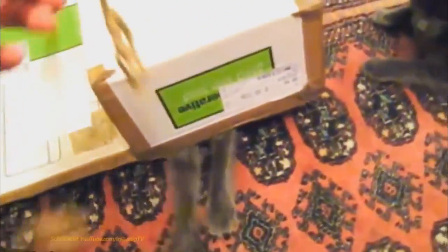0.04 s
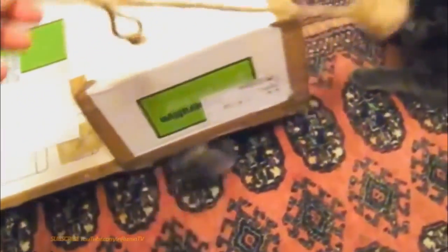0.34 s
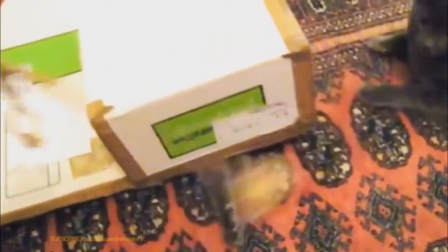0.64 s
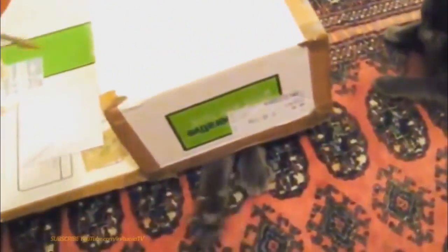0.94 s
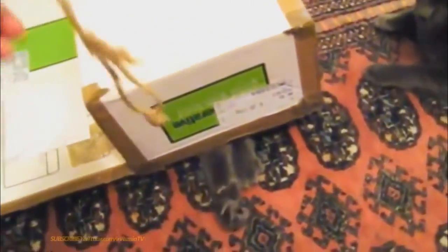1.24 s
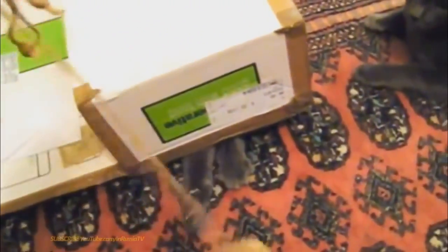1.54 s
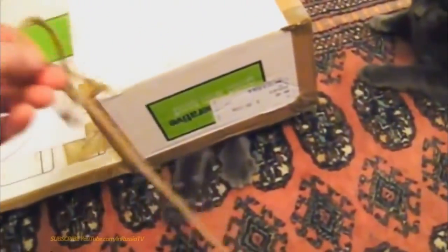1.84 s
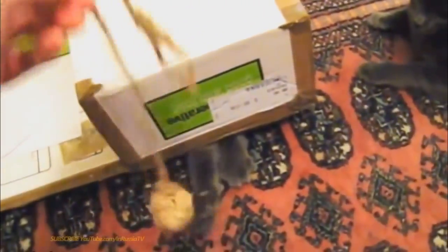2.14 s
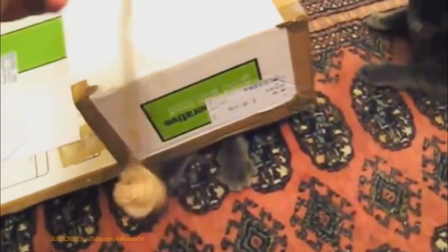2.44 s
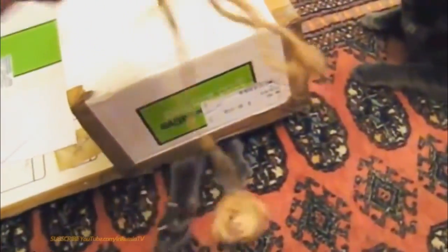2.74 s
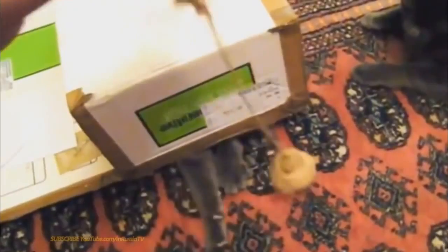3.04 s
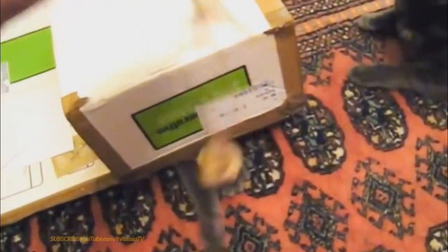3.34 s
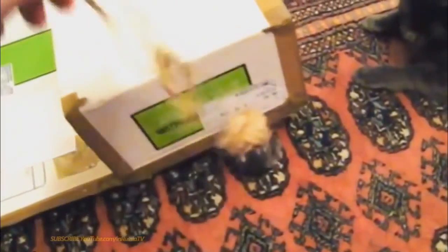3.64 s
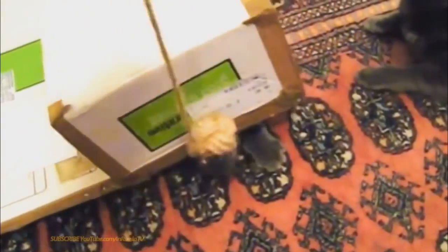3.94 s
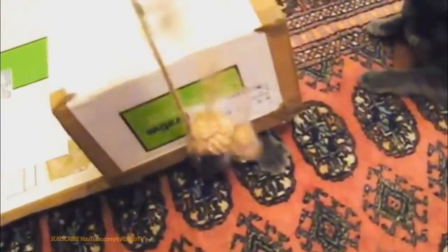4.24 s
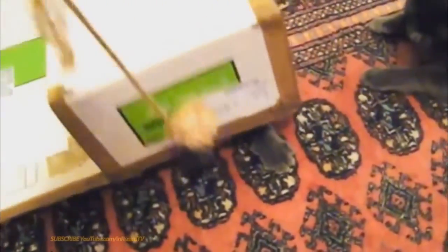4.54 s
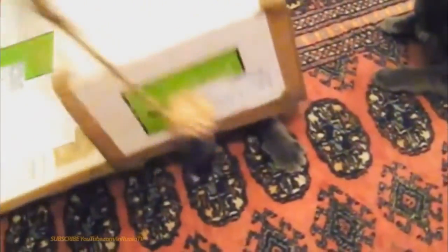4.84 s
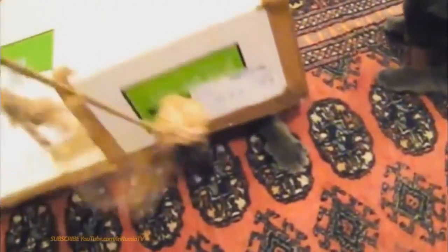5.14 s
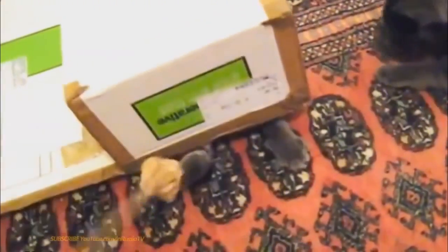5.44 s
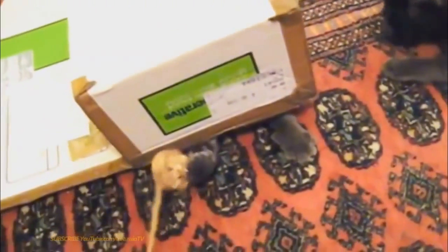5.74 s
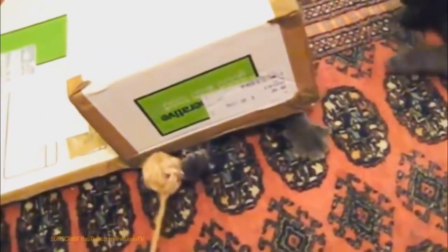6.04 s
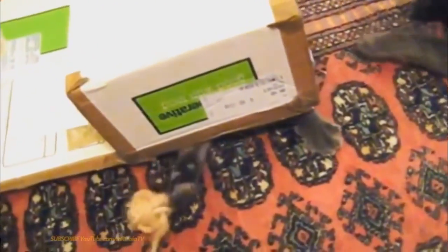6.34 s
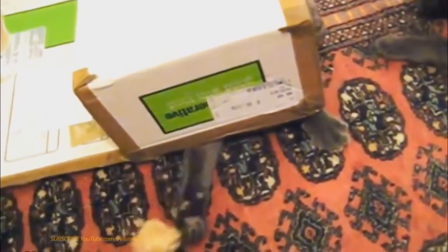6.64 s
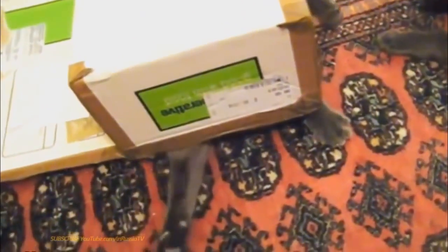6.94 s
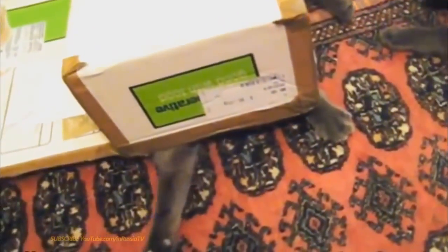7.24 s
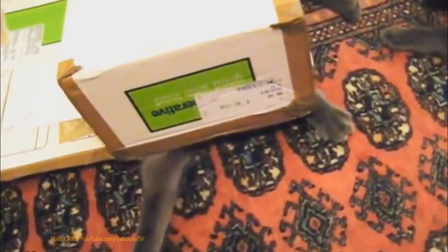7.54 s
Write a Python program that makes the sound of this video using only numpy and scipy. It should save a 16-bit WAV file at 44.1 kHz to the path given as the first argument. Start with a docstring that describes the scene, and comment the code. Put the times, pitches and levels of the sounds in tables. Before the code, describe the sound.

Close up in a furnished room, light taps and scuffs on cardboard lead into hollow bumps as a cat jostles a box on a rug. The loudest thump comes near the middle, followed by a quick flurry of knocks, claw ticks and rustling. It ends with softer scuffs and a few faint squeaks of a leg against the rim. A barely audible little bell jingles now and then over gritty room noise.

```python
"""An upturned cardboard box thumps on a rug as the cat under it swipes at a twine ball.
Landings ring the cavity, lid and walls; a loose flap chatters; claws and ball tap the cardboard.
Fur and paws scuff, a leg squeaks along the rim, a pellet skids faintly in a tiny bell.
One close microphone, furnished room. Coarse quantising turns room tone and low hum gritty;
a faint steady hiss is added after it."""
import sys
import numpy as np
from scipy import signal
from scipy.fft import rfft, irfft, next_fast_len
from scipy.io import wavfile

SR = 44100
rng = np.random.default_rng(int(sys.argv[2]) if len(sys.argv) > 2 else 0)


def persist_wave(psi):
    """Save psi, clipped to +-1, as 16-bit WAV."""
    counts = np.round(np.clip(psi, -1, 1) * 32767).astype(np.int16)
    wavfile.write(sys.argv[1], SR, np.atleast_2d(counts).T)


N = 339380
AGE_S = np.arange(SR // 2) / SR  # time since a blow

# landings: t/s, level/dB, cavity and lid tuning/ratio, hardness (0 cushioned, 1 stiff edge),
# flatness (0 corner, 1 whole rim)
LANDINGS = [(.602, -44.5, .7, 0.29, 0.81), (1.536, -28.5, 0.78, 0.34, 0.47), (1.544, -22, 0.83, 0.13, 0.77),
            (1.572, -32, 0.74, 0.4, 0.58), (2.062, -31, 0.7, 0.16, 0.81), (2.215, -38.5, 0.76, 0.11, 0.98),
            (2.4399, -27, 0.68, 0.43, 1), (2.4476, -29, 1.06, 0.73, 0.45), (3.4496, -17, 0.83, 0.42, 0.11),
            (3.6155, -20, 1.29, 0.79, 0.84), (4.072, -43.5, 1.17, 0.94, 0.11),
            (4.1952, -36.5, 1.3, 0.85, 0), (4.666, -26.5, 0.64, 0.071, 0.31),
            (4.6767, -27, 1.18, 0.14, 0.43), (4.685, -33, 1.46, 0.98, 0.24),
            (4.6947, -27.5, 1.3, 0.69, 0.3), (4.741, -37.5, 0.72, 0.21, 0.72),
            (4.77, -35.5, 1.17, 0.2, 0.83), (4.946, -37.5, 1.02, 0.11, 0.91),
            (5.0398, -25, 1.04, 0.18, 0.79), (5.094, -37.5, 1.1, 0.96, 0.41), (5.101, -28.5, 1.02, 0.12, 1),
            (5.4074, -25, 1.04, 0.32, 0.95), (5.795, -45.5, 1.24, 0.32, 0.84), (5.926, -43, 1.02, 0.77, 1),
            (6.23, -27, 1.06, 0, 0.59), (6.247, -36.5, 0.58, 0.019, 0.2), (7.225, -42.5, 0.88, 0.74, .05)]
# box modes (1 cavity, 2 lid, then walls): untuned f/Hz, relative level/dB, t60/s
BOX_MODES = [(113.9, 1, 0.053), (222, 4.5, 0.04), (331, -3.5, 0.019), (400.3, 0, 0.035), (488.7, -3.5, .05),
             (584, -6.5, .04), (708.7, -10, 0.053), (883.5, -6, 0.034), (1046, -14.5, 0.02),
             (1232, -6, 0.014)]
# hollow notes from mid-wall blows: t/s, f/Hz, level/dB
WALL_RINGS = [(.603, 617, -44), (1.539, 678, -33.5), (2.445, 476, -28), (2.456, 680, -33),
              (2.494, 455, -38.5), (4.695, 397, -30), (4.805, 548, -34), (5.07, 540, -34.5),
              (6.233, 462, -46), (6.258, 206, -37), (6.436, 213.6, -37), (7.04, 755, -49)]
# flap slaps: t/s, level/dB
SLAPS = [(1.534, -41.5), (4.668, -43.5), (4.673, -43), (4.682, -43), (4.695, -45.5), (5.41, -41.5)]
# flap modes: unbent f/Hz, relative level/dB
FLAP_MODES = [(1250, 4.5), (1544, 1), (1918, 3), (2900, -5.5), (3440, -3)]
# taps: t/s, level/dB, sharpness (0 ball on a wall, 1 claw tip)
TAP_HITS = [(.206, -51.5, 0.15), (.388, -44.5, 0.11), (0.6005, -39.5, 0.4), (1.5335, -31, 0.86),
            (1.541, -30.5, 0.86), (2.0595, -43, 0.023), (2.346, -45.5, 0.97), (2.441, -32.5, 0.027),
            (3.7655, -46.5, 0.13), (4.195, -44, 0.66), (4.605, -39, 0.34), (4.6833, -40, 0.55),
            (4.778, -38.5, 0.75), (4.806, -33, 0.25), (4.985, -43.5, 0.87), (5.067, -31.5, 0.58),
            (5.267, -45, 0.74), (5.304, -43.5, 0.15), (5.336, -38, 0.03), (5.3692, -38, 0.44),
            (5.482, -38, 0.11), (5.598, -48, 0.064), (6.149, -50.5, 0.14), (7.0393, -44, 0.025)]
# contact spectra: f/Hz, relative level/dB
CRACK_SHAPE = [(300, -11.5), (850, -3.5), (1450, 11.5), (3200, -4), (4600, -9.5), (8000, -20)]  # fibres crushed on landing
SNAP_SHAPE = [(1500, -6), (3000, 2), (4500, -9.5), (9000, -18.5)]  # flap edge catching
FOLD_SHAPE = [(400, -39), (900, 19.5), (1400, 10.5), (2100, -0.5), (3000, -21.5), (6000, -12)]  # tapped fold
CLAW_SHAPE = [(1200, -25.5), (2300, 8.5), (4500, -1.5), (7000, -14), (10000, -33)]  # claw tip
# sweeps of fur, twine and paws: t/s, length/s, swish level/dB, drum level re swish/dB
SWEEPS = [(0.192, 0.03, -57.5, 0.5), (0.373, 0.029, -47, -5), (0.432, 0.076, -48, -2.5),
          (0.584, 0.1, -51.5, 6.5), (2.656, 0.085, -59, 8.5), (3.58, 0.074, -52, 9.5),
          (4.178, 0.11, -49.5, -4), (4.416, 0.47, -48.5, -0.5), (4.994, 0.15, -48.5, -2.5),
          (5.199, 0.22, -51, 3), (5.85, 0.7, -52.5, -0.5), (6.69, 0.096, -50, 2.5), (6.952, 0.098, -54, 5),
          (7.161, 0.12, -50, -0.5), (7.345, 0.31, -53, 0)]
# friction spectra: f/Hz, relative level/dB
SWISH_SHAPE = [(300, -15.5), (800, -1.5), (1400, 0), (2600, -5), (10000, -26.5)]  # rubbed surface
DRUM_SHAPE = [(60, -7.5), (190, -0.5), (330, -4), (520, 0.5), (1300, -7.5), (3000, -37)]  # walls drumming along
# leg slides on the rim: t/s, length/s, start f/Hz, end f/Hz, level/dB
SLIDES = [(6.824, 0.12, 1060, 990, -54.5), (6.915, 0.12, 1036, 895, -52), (6.985, 0.11, 525, 780, -51),
          (7.109, 0.12, 960, 975, -55)]
# bell shakes: t/s, level/dB, most excited f/Hz
BELL_SHAKES = [(.19, -59, 4070), (.59, -58, 4360), (2.065, -56, 4640), (2.217, -54, 4020),
               (2.24, -56, 4080), (3.0, -61, 4050), (3.476, -55.5, 4050), (5.06, -58, 4500),
               (5.255, -56, 4430), (5.598, -57, 4370), (5.625, -52, 4480), (6.4, -58.5, 4250),
               (7.02, -56, 4270)]
# bell shell modes: f/Hz
BELL_MODES = [4010, 4314, 4450, 4650]
# room decay: f/Hz, t60/s
ROOM_DECAY = [(80, .33), (200, 0.29), (500, .35), (1200, 0.25), (3000, 0.16), (9000, 0.25)]
# room tone and microphone noise: f/Hz, relative level/dB
AIR_SHAPE = [(25, -8), (60, 0.54), (110, -.5), (330, -8.5), (500, -13), (1500, -17.5), (3000, -27.5),
             (9500, -56)]
# hum bands: f/Hz, resonator width/Hz, level/dB
HUM_BANDS = [(82.88, 8, -61), (237.9, 10, -56)]
# converter smoothing: f/Hz, level/dB
DROOP_SHAPE = [(3000, 0), (10000, -3.5)]


def box_thumps(cushioning=0.49, padding=0.8, firm_db=-24.5):
    """Flat landings trap more air; hard ones shake the walls and crack the edge."""
    out = np.zeros(N)
    cavity, lid, walls = BOX_MODES[:1], BOX_MODES[1:3], BOX_MODES[3:]
    for t_s, level_db, tuning, hardness, flatness in LANDINGS:
        cavity_db = between((-24.5, -1.5), flatness)
        wall_db = between((-16.5, -0.5), hardness)
        crack_db = between((-30.5, -13), hardness)
        softness = amp(-cushioning * min(level_db + wall_db + 33.5, 0))  # rug cushions light landings
        softness *= 1 + padding * np.exp(-10 * hardness)  # a paw muffles most
        # rim gap and cat's weight set the tuning
        blow = amp(cavity_db) * panel(cavity, tuning, contact_s=0.00055 * softness)
        blow += panel(lid, tuning, contact_s=0.0004 * softness)
        blow += amp(wall_db) * panel(walls, 0.93, contact_s=0.00026 * softness)
        blow += amp(crack_db) / softness * crunch(CRACK_SHAPE, decay_s=0.0015, grit=0.93)
        wet_db = -9 + 0.2973 * (firm_db - level_db)  # lighter: deeper in the box, more diffuse
        add(out, t_s, amp(level_db) * room(blow, wet_db))
    return out


def wall_notes(t60_s=0.07):
    """A wall swings as a whole and outlasts the thump."""
    out = np.zeros(N)
    for t_s, f_hz, level_db in WALL_RINGS:
        add(out, t_s, amp(level_db) * burst(ring(f_hz, t60_s)))
    return room(out, wet_db=-16)


def flap_chatter(detune=0.023, t60_s=0.026, snap_db=-2):
    """Each slap snaps and rings the flap's stiff modes, retuned by bending."""
    out = np.zeros(N)
    for t_s, level_db in SLAPS:
        bend = 1 + detune * rng.uniform(-1, 1)
        slap = sum(rng.choice([-1, 1]) * amp(db) * ring(f_hz * bend, t60_s) for f_hz, db in FLAP_MODES)
        snap = amp(snap_db) * crunch(SNAP_SHAPE, decay_s=0.0057, grit=11)
        add(out, t_s, amp(level_db) * (burst(slap) + snap))
    return room(out, wet_db=-11)


def taps(brightening=0.67, spot_db=-10.5):
    """Claws and ball excite walls, folds and the struck spot; harder ticks are brighter."""
    out = np.zeros(N)
    walls = [(f_hz, db + 7 * np.log2(f_hz / 600), t60_s) for f_hz, db, t60_s in BOX_MODES[3:]]
    for t_s, level_db, sharpness in TAP_HITS:
        wall_db = level_db + between((-1.5, -4.5, -26), sharpness)
        fold_db = level_db + between((-9.5, -7.5, -13.5), sharpness)
        claw_db = level_db + between((-13.5, -19.5, -5.5), sharpness)
        knock = amp(wall_db) * panel(walls, rng.uniform(0.9, 1.03), contact_s=0.00021)
        fold = amp(fold_db) * crunch(FOLD_SHAPE, decay_s=0.0027, grit=2.1)
        tilt_db_per_oct = brightening * (claw_db + 50.5)
        tick_shape = [(f_hz, db + tilt_db_per_oct * np.log2(f_hz / 3000)) for f_hz, db in CLAW_SHAPE]
        tick = amp(claw_db) * crunch(tick_shape, decay_s=0.0025, grit=1.7)
        spot_hz = between((786, 3080), sharpness)
        spot = amp(level_db + spot_db) * burst(ring(spot_hz, t60_s=0.0046))
        add(out, t_s, room(knock, wet_db=-2) + room(fold + tick + spot, wet_db=-4))
    return out


def scuffs(catches_per_s=520, spread_db=3, unevenness_db=2.5):
    """Fur catches on fibres under uneven pressure; the cardboard drums along."""
    swish_gain, drum_gain = amp(-61), amp(-60)  # constant fidgeting
    for t_s, length_s, swish_db, drum_db in SWEEPS:
        sweep = amp(swish_db) * stroke(t_s, length_s)
        swish_gain = np.hypot(swish_gain, sweep)
        drum_gain = np.hypot(drum_gain, amp(drum_db) * sweep)
    drift = unit(signal.oaconvolve(rng.standard_normal(N), np.hanning(1400), "same"))
    pressure = amp(unevenness_db * np.tanh(drift))
    catch_sizes = amp(spread_db * np.minimum(rng.exponential(1, N), 2))
    catches = impulses(catches_per_s, N) * catch_sizes
    friction = pressure * (rng.standard_normal(N) + unit(catches))
    swish = swish_gain * unit(colour(friction, SWISH_SHAPE))
    drum = drum_gain * unit(colour(friction, DRUM_SHAPE))
    return swish + drum


def rim_squeaks(width_hz=210, slips_per_s=100):
    """Uneven slips of a leg on the rim drive a gliding resonance."""
    out = np.zeros(N)
    for t_s, length_s, start_hz, end_hz, level_db in SLIDES:
        progress = AGE_S[AGE_S < length_s] / length_s
        pitch_hz = between((start_hz, end_hz), progress)
        slips = impulses(slips_per_s, len(AGE_S))[:len(progress)]
        grip = np.sqrt(np.sin(np.pi * progress))
        add(out, t_s, amp(level_db) * unit(grip * resonate(slips, pitch_hz, width_hz)))
    return out


def bell(rattle_s=0.026, scrape_s=0.002, t60_s=0.17, fall_db_per_hz=0.018, rasp_db=-2):
    """The pellet skids four times per shake, rasping and ringing the shell modes nearest its path."""
    out = np.zeros(N)
    for t_s, level_db, centre_hz in BELL_SHAKES:
        shell = sum(amp(-fall_db_per_hz * abs(f_hz - centre_hz)) * ring(f_hz, t60_s)
                    for f_hz in BELL_MODES)
        for delay_s in np.append(0, rng.uniform(0, rattle_s, size=3)):
            skid = rng.standard_normal(len(AGE_S)) * AGE_S * np.exp(-AGE_S / scrape_s)
            rasp = amp(rasp_db) * burst(resonate(skid, centre_hz, width_hz=600))
            chime = burst(signal.fftconvolve(skid, shell)[:len(AGE_S)])
            add(out, t_s + delay_s, amp(level_db) * (chime + rasp) / 2)  # four skids share the energy
    return room(out, wet_db=-13.5)


def room_tone(air_db=-51):
    """Dull steady noise and a wavering low hum."""
    air = amp(air_db) * unit(colour(rng.standard_normal(N), AIR_SHAPE))
    hum = sum(amp(db) * unit(resonate(rng.standard_normal(N), f_hz, width_hz))
              for f_hz, width_hz, db in HUM_BANDS)
    return air + hum


def room(x, wet_db, onset_s=0.0092):
    """Adds diffuse reflections that build up, then die band by band; new tail per call."""
    f_hz, t_s, bands = signal.stft(rng.standard_normal(len(AGE_S)), SR, nperseg=256)
    decay = amp(-60 * t_s / lookup(ROOM_DECAY, f_hz)[:, None])
    tail = signal.istft(bands * decay, SR)[1][:len(AGE_S)]
    tail *= 1 - np.exp(-(AGE_S / onset_s) ** 2)
    return x + amp(wet_db) * signal.fftconvolve(x, tail / np.linalg.norm(tail))[:len(x)]


def panel(modes, tuning, contact_s):
    """Cardboard velocity after a push; longer contact is duller."""
    flex = sum(amp(db) * ring(f_hz * tuning, t60_s) / f_hz for f_hz, db, t60_s in modes)
    velocity = np.diff(flex, prepend=0)
    push = AGE_S * np.exp(-AGE_S / contact_s)
    return burst(signal.fftconvolve(velocity, push)[:len(AGE_S)])


def crunch(shape, decay_s, grit):
    """A snap, then fibres giving way."""
    fibres = rng.standard_normal(len(AGE_S)) * np.exp(-AGE_S / decay_s)
    force = grit * np.sqrt(2 / (decay_s * SR)) * fibres
    force[0] += 1
    return burst(colour(force, shape))


def ring(f_hz, t60_s):
    """One damped mode."""
    return np.sin(2 * np.pi * f_hz * AGE_S) * amp(-60 * AGE_S / t60_s)


def stroke(t_s, length_s, rise_share=0.28, fade_s=0.05):
    """Sweep pressure: rise, hold, fade."""
    age_s = np.arange(N) / SR - t_s
    rise = np.clip(age_s / (rise_share * length_s), 0, 1)
    return rise * np.exp(-np.maximum(age_s - length_s, 0) / fade_s)


def impulses(rate_per_s, samples):
    """Unit impulses, random in time and sign."""
    return (rng.random(samples) < rate_per_s / SR) * rng.choice([-1, 1], samples)


def resonate(x, f_hz, width_hz):
    """Two equal resonators in series; f_hz may glide."""
    carrier = np.exp(2j * np.pi * np.cumsum(f_hz * np.ones(len(x))) / SR)
    pole = np.exp(-np.pi * width_hz / SR)
    for _ in range(2):
        x = 2 * (carrier * signal.lfilter([1 - pole], [1, -pole], x / carrier)).real
    return x


def colour(x, shape):
    """Minimum-phase filter with the given spectrum."""
    samples = x.shape[-1]
    size = next_fast_len(samples + 2048)
    log_gain = np.log(amp(lookup(shape, abs(np.fft.fftfreq(size, 1 / SR)))))
    response = np.exp(np.conj(signal.hilbert(log_gain)))[:size // 2 + 1]
    return irfft(rfft(x, size) * response, size)[..., :samples]


def lookup(table, f_hz):
    """Interpolates over log frequency."""
    knots_hz, values = np.transpose(table)
    return np.interp(np.log(f_hz + 1), np.log(knots_hz), values)


def between(values, control):
    """Interpolates values spaced evenly over control 0..1."""
    return np.interp(control, np.linspace(0, 1, len(values)), values)


def amp(db):
    """dB to gain."""
    return 10 ** (np.asarray(db) / 20)


def unit(x):
    """Scales to rms 1."""
    return x / np.sqrt(np.mean(x ** 2) + 1e-20)


def burst(x):
    """Scales to the energy of 20 ms at rms 1."""
    return x / np.sqrt(np.sum(x ** 2) / (SR * 0.02) + 1e-20)


def add(mix, t_s, sound):
    """Mixes in at t_s."""
    part = mix[max(round(t_s * SR), 0):][:len(sound)]
    part += sound[:len(part)]


def scene():
    """One microphone feeds both channels."""
    box = box_thumps() + wall_notes() + flap_chatter()
    mono = box + taps() + scuffs() + rim_squeaks() + bell() + room_tone()
    return np.tile(mono, (2, 1))


def record(dry, step=0.0073, hiss_db=-61, cut_hz=10000, leak_top_hz=13900, leak_db=-22):
    """Faint steady hiss added after coarse quantising; then treble droop and a steep, leaky low-pass."""
    stepped = step * np.floor(dry / step - 0.14)
    smoothed = colour(stepped + amp(hiss_db) * rng.standard_normal(N), DROOP_SHAPE)
    main, wide = (signal.firwin(511, f_hz, window=("kaiser", 8), fs=SR)
                  for f_hz in (cut_hz, leak_top_hz))
    lowpass = main + amp(leak_db) * (wide - main)
    return signal.oaconvolve(smoothed, lowpass[None], "same")


dry = scene()
out = record(dry)
persist_wave(out)
```